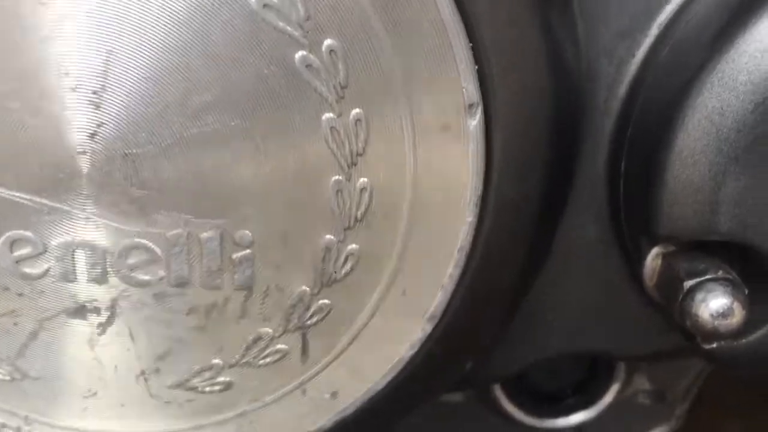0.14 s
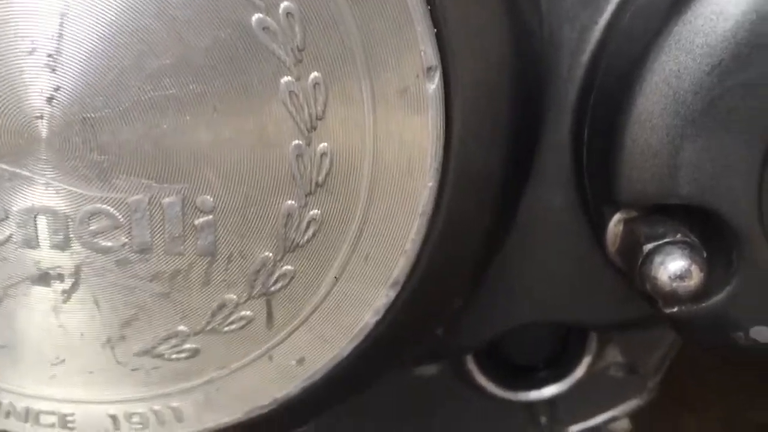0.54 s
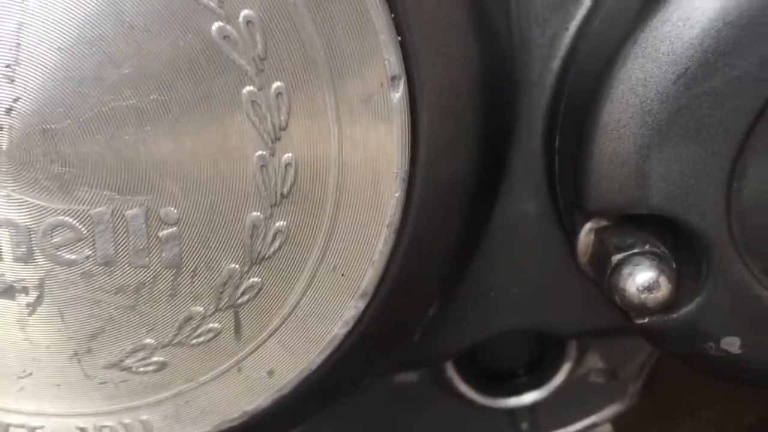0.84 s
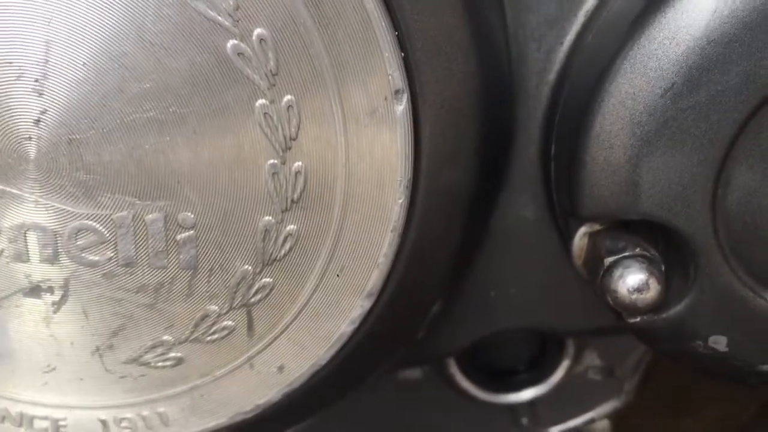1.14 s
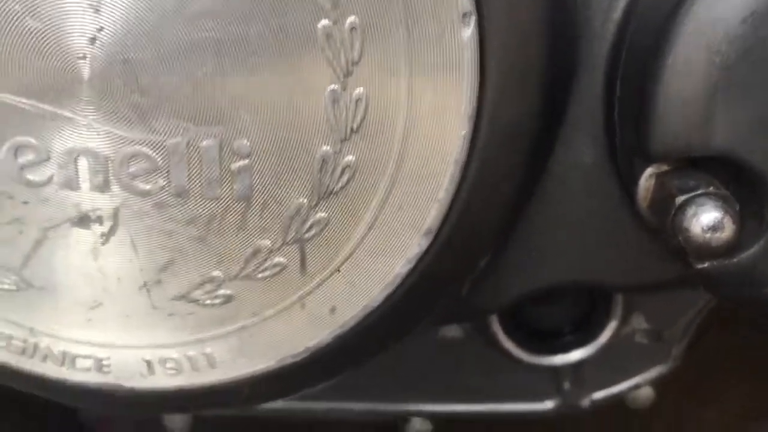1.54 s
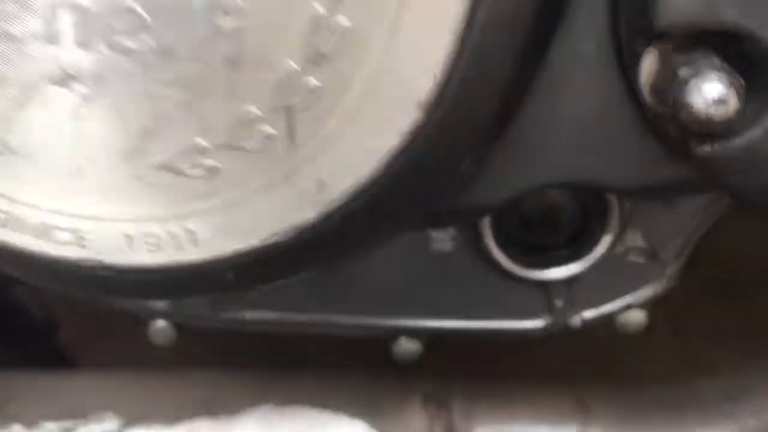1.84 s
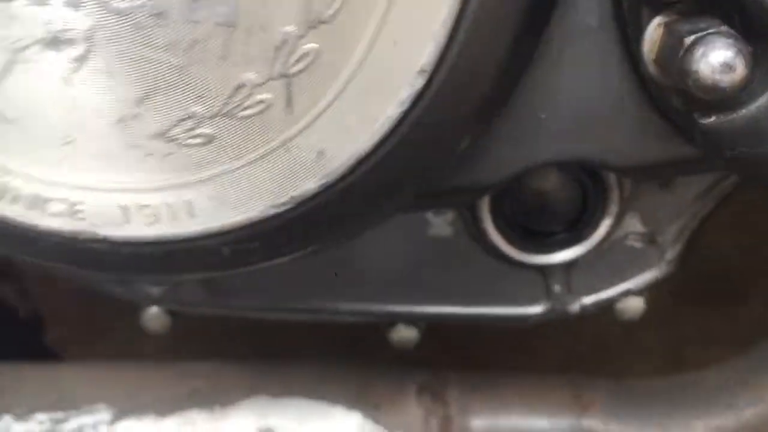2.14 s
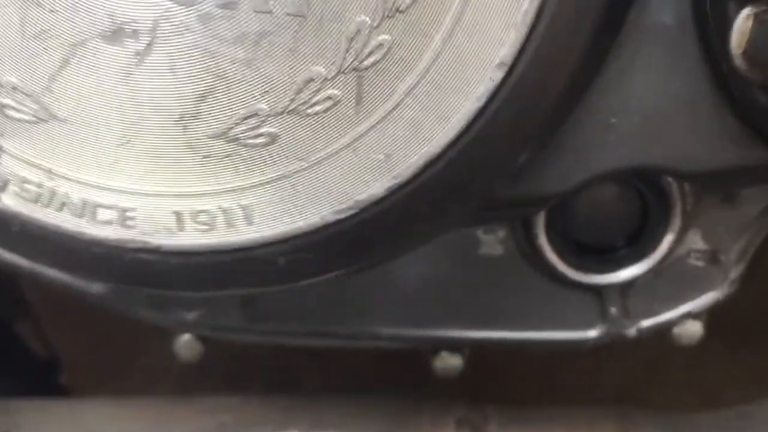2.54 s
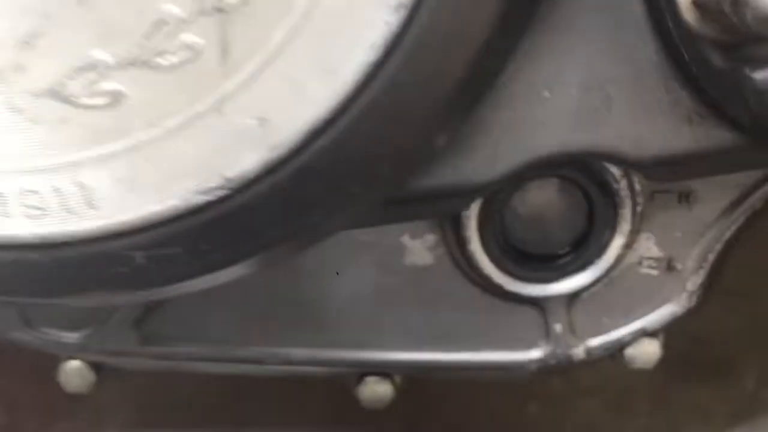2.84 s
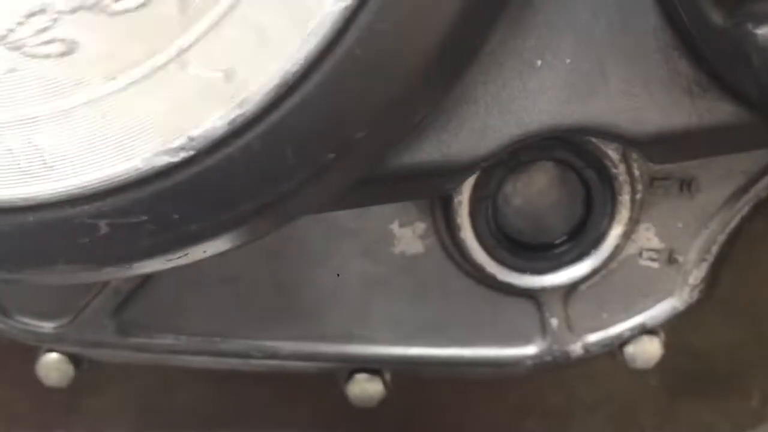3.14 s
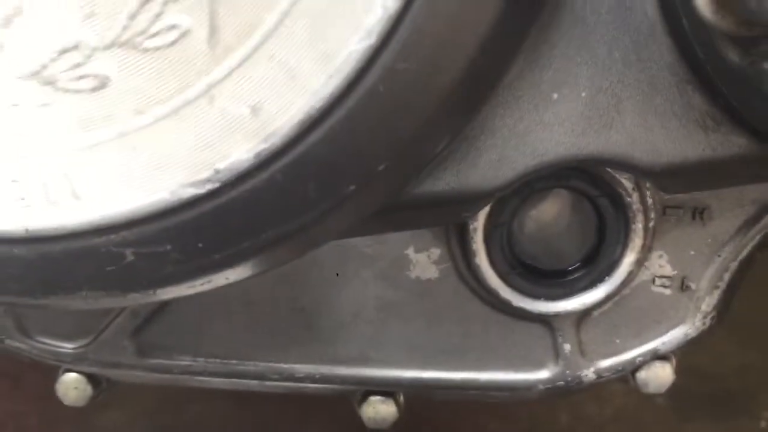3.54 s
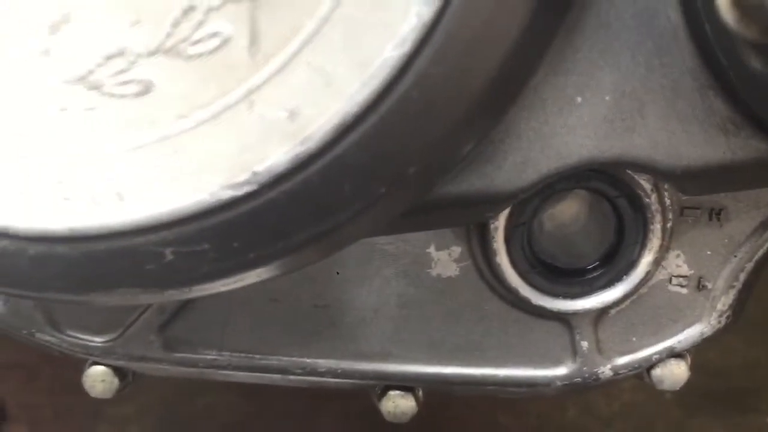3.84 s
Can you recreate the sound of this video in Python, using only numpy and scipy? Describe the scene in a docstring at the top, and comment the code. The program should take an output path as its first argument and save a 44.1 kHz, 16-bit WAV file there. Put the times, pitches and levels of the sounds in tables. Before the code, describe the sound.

A motorcycle engine starts beside the microphone, outdoors. Until about 0.85 s there is faint low rumble, a distant motor and light rustles, with a low hum swelling from 0.6 s. At 0.86 s the starter gear clacks in, grinds and whines, then coasts with short rasps, fading by about 2 s. After weak puffs, it catches near 1.3 s: boomy pulses, quickening slightly to about fifteen per second, with metallic rattle, continue to the end.

```python
"""A motorcycle starts cold, heard close to the crankcase. First come faint outdoor noise, low rumble, a distant
motor and a few rustles. A low hum swells, then the starter gear slams in as ringing metal and a noise crack.
It grinds and whines, made from random knocks and a wavering tone, coasts down as fading noise and rasps again.
After two weak puffs the engine catches: valve gear and chain rattle as shaped noise, and each firing rings
the exhaust and a long low boom as damped sines. The idle creeps up."""
import sys
import numpy as np
from scipy import signal
from scipy.fft import rfft, irfft, next_fast_len
from scipy.io import wavfile
from scipy.ndimage import uniform_filter1d, map_coordinates

SR = 44100
rng = np.random.default_rng(int(sys.argv[2]) if len(sys.argv) > 2 else 0)


def field_ratio(decibels):
    """Amplitude ratio for a level in dB (20 dB per decade); scalars and array-likes work."""
    return 10 ** (np.asarray(decibels, dtype=float) / 20)


def persist_wave(psi):
    """Save psi, clipped to +-1, as 16-bit WAV."""
    counts = np.round(np.clip(psi, -1, 1) * 32767).astype(np.int16)
    wavfile.write(sys.argv[1], SR, np.atleast_2d(counts).T)


N = 176400  # samples: 4 s


def unit(x):
    """Scaled to rms 1."""
    return x / np.sqrt(np.mean(x ** 2) + 1e-20)


def noise():
    """White noise of the scene's length."""
    return rng.standard_normal(N)


def curves(rows):
    """One value per sample for each column after the time."""
    s, *cols = np.transpose(rows)
    return [np.interp(np.arange(N) / SR, s, c) for c in cols]


def wobble(rate):
    """A smooth random curve through rate random points a second."""
    points = rng.standard_normal(int(N * rate / SR) + 4)
    return map_coordinates(points, [np.arange(N) * rate / SR])


def span(t0, t1):
    """1 between two times in seconds, with 3 ms edges."""
    t = np.arange(N) / SR
    return np.clip(np.minimum(t - t0, t1 - t) * 333, 0, 1)


def filtered(x, response):
    """x times a response of frequency."""
    m = next_fast_len(N + SR // 2)
    return irfft(rfft(x, m) * response(np.fft.rfftfreq(m, 1 / SR)), m)[:N]


def coloured(x, spectrum):
    """x shaped by a curve through (pitch_hz, level_db) points, rms 1."""
    f, v = np.transpose(spectrum)
    return unit(filtered(x, lambda hz: field_ratio(np.interp(np.log(hz + 1), np.log(f + 1), v))))


def resonant(x, peaks):
    """x through resonances (pitch_hz, width_hz, level_db), rms 1."""
    def response(f):
        total = 0
        for k, (centre, width, db) in enumerate(peaks):
            peak = 1j * f * width / (centre * centre - f * f + 1j * f * width)
            total = total + (-1) ** k * field_ratio(db) * peak  # neighbours have opposite sign
        return total
    return unit(filtered(x, response))


def patchy(x, depth_db):
    """x with small random patches of gain in time and frequency, rms 1."""
    z = signal.stft(x, nperseg=256)[2]
    field = uniform_filter1d(rng.standard_normal(z.shape), size=4, axis=0)
    field = uniform_filter1d(field, size=4, axis=1)
    return unit(signal.istft(z * field_ratio(depth_db * unit(field)), nperseg=256)[1][:N])


def knocks(per_s, spread_db, hiss):
    """Random metal contacts of uneven size over hiss."""
    size = field_ratio(spread_db * np.minimum(rng.exponential(size=N), 4)) * noise()
    return unit(size * (rng.random(N) < per_s / SR)) + hiss * noise()


def ring(t, hz, db, t60, attack_s=0.0016, swoop=0):
    """A damped sine from t = 0 that starts flat by the share swoop and glides up to pitch."""
    t = np.maximum(t, 0)
    glide_s = 0.014
    turns = hz * (t - swoop * glide_s * (1 - np.exp(-t / glide_s)))
    return field_ratio(db - 60 * t / t60) * np.sin(2 * np.pi * turns) * (1 - np.exp(-t / attack_s)) ** 2


# outdoor noise over time: time_s, level_db
YARD_LEVEL = [(0.05, -49.5), (0.466, -48), (0.58, -51), (0.702, -54), (0.85, -49)]
# tone of the outdoor noise: pitch_hz, level_db (relative)
YARD_COLOUR = [(150, -45), (250, -0.5), (418, -7.5), (570, 0.5), (900, -7), (2200, -9), (4500, -20),
               (15000, -39.5)]


def outdoors():
    """Faint outdoor noise: patchy shaped noise."""
    return field_ratio(curves(YARD_LEVEL)[0]) * patchy(coloured(noise(), YARD_COLOUR), depth_db=2.0)


# tone of the rumble: pitch_hz, level_db (relative)
RUMBLE_COLOUR = [(25, -24), (38, -41), (59, 15.5), (129, -4.5), (170, -8.5), (215, -8), (420, -68)]


def rumble():
    """Low shaped noise whose level drifts around -32.5 dB."""
    return field_ratio(-32.5 + 1.23 * wobble(6.34)) * coloured(noise(), RUMBLE_COLOUR)


# steady tones of a distant motor: pitch_hz, level_db (before slow wobble)
MOTOR_TONES = [(53.8, -38.5), (156.1, -56), (209.9, -63)]


def distant_motor():
    """A few sines of drifting level that fade out by 0.38 s."""
    t = np.arange(N) / SR
    fade = np.clip((0.38 - t) / 0.057, 0, 1)
    tones = sum(field_ratio(db + 1.6 * wobble(6.3)) * np.sin(2 * np.pi * hz * t) for hz, db in MOTOR_TONES)
    return np.sqrt(2) * tones * fade


# rustles near the microphone: start_s, length_s, level_db (before wobble and fade), centre_hz, width_hz
RUSTLE_EVENTS = [(.007, .06, -49, 6000, 6000), (.432, .28, -53, 4800, 1900), (.75, .3, -56, 1900, 400),
                 (.79, .3, -62, 7000, 2000)]
# a faint tone in a rustle: start_s, length_s, level_db (before wobble), pitch_hz
SQUEAK_EVENT = (.44, .12, -60, 3250)


def rustle():
    """Short bands of grainy noise that start quickly and fade, one with a faint squeak."""
    t, out = np.arange(N) / SR, 0
    for start, length, db, hz, width_hz in RUSTLE_EVENTS:
        grains = knocks(600, spread_db=3, hiss=1.5)
        grains = unit(filtered(grains, lambda f: np.exp(-((f - hz) / width_hz) ** 2)))
        fade = np.clip(1 - (t - start) / length, 0, 1) * span(start, start + length)
        out = out + field_ratio(db + 2.5 * wobble(30)) * fade * grains
    start, length, db, hz = SQUEAK_EVENT
    squeak = field_ratio(db + 3.3 * wobble(50)) * np.sin(2 * np.pi * hz * t)
    return out + span(start, start + length) * squeak


# the low hum: time_s, pitch_hz, level_db
HUM_PATH = [(0.45, 74.7, -51), (0.554, 72.6, -49), (0.633, 72.9, -21.5), (0.702, 70.8, -20),
            (0.775, 79.3, -37), (0.79, 78.3, -22.5), (0.824, 76.4, -29), (0.855, 74.8, -17),
            (0.908, 69, -20.5), (1.161, 69.2, -25.5), (1.176, 70.8, -41), (1.234, 72.1, -20.5),
            (1.3, 73.5, -23)]


def hum():
    """One low sine that swells before the start, its pitch and level wandering."""
    hz, db = curves(HUM_PATH)
    tone = np.sqrt(2) * np.sin(2 * np.pi * np.cumsum(hz) / SR)
    return field_ratio(db) * tone * span(HUM_PATH[0][0], HUM_PATH[-1][0])


# the gear slamming in: time_s, level_db (relative)
SLAM_HITS = [(0.8634, -3)]
# ringing of the slam: pitch_hz, level_db (relative), ring_s (time to fall 60 dB)
SLAM_RINGS = [(1750, -5, .03), (2900, -6, .02), (4680, -3, .012), (7230, -3, .012), (8000, 0, .012)]


def slam():
    """The starter gear hits home: damped metal rings and a short crack of noise."""
    t, rings, crack = np.arange(N) / SR, 0, 0
    crack_t60 = 0.02  # s
    for s, db in SLAM_HITS:
        for hz, level, t60 in SLAM_RINGS:
            rings = rings + ring(t - s, hz, db + level - 6, t60, attack_s=0.00031)
        crack = crack + field_ratio(db - 10 - 60 * np.maximum(t - s, 0) / crack_t60) * (t > s)
    return rings + crack * noise()


# starter under load: time_s, level_db (relative)
GRIND_LEVEL = [(.868, -26), (.88, -29), (.905, -20), (.95, -17), (.99, -17), (1.015, -20), (1.055, -15),
               (1.074, -18), (1.09, -30)]
# resonances of the gear housing: pitch_hz, width_hz, level_db (relative)
HOUSING = [(1910, 140, 3.5), (2193, 21, 1.5), (2530, 86, 0), (3064, 94, 2.5), (3410, 99, -1),
           (4356, 57, -4), (8570, 90, -12.5), (9750, 260, -16.5)]
# tone of the noise under the gear teeth: pitch_hz, level_db (relative)
GRIND_BED = [(300, -18.5), (771, -19.5), (1170, -7), (1270, -14), (1980, 0), (4690, -19.5), (10400, -24.5),
             (15700, -33)]
# the gear rasps again on the next compression: start_s, length_s, level_db (relative)
RASP_EVENTS = [(1.186, .011, -15), (1.2, .008, -15), (1.236, .011, -17), (1.247, .022, -11.5)]
# the rasps also ring the pinion: pitch_hz, width_hz, level_db (relative)
PINION_RING = [(7130, 110, -7)]


def grinding():
    """Gear teeth knock through the housing's resonances over a noise bed; later rasps also ring the pinion."""
    teeth = resonant(knocks(550, spread_db=1, hiss=1.2), HOUSING)
    bed = coloured(noise(), GRIND_BED)
    grind = patchy(teeth + .9 * bed, depth_db=1.6)
    load = field_ratio(curves(GRIND_LEVEL)[0] + 2.5) * span(GRIND_LEVEL[0][0], GRIND_LEVEL[-1][0])
    rasp = sum(field_ratio(db) * span(s - .002, s + length + 0.00097) for s, length, db in RASP_EVENTS)
    pinion = field_ratio(-16) * resonant(noise(), PINION_RING)
    return (load + rasp) * grind + rasp * pinion


# starter whine under load: time_s, pitch_hz (before wobble), level_db (before wobble)
WHINE_PATH = [(0.901, 4900, -48), (.98, 5150, -31), (1.04, 6000, -34), (1.071, 5150, -28),
              (1.085, 5100, -50)]


def whine():
    """An unsteady gear tone and its half order climb and sag with the motor's speed."""
    hz, db = curves(WHINE_PATH)
    turn = 2 * np.pi * np.cumsum(hz + 170 * wobble(300)) / SR
    tone = field_ratio(4 * wobble(80)) * np.sin(turn)
    half_order = field_ratio(9 + 3 * wobble(60)) * np.sin(turn / 2)
    return field_ratio(db) * (tone + half_order) * span(WHINE_PATH[0][0], WHINE_PATH[-1][0])


# starter coasting: time_s, level_db (before surge and flicker)
COAST_LEVEL = [(1.058, -25), (1.1, -20.5), (1.3, -18.5), (1.549, -25), (1.8, -30), (2.3, -65)]
# tone of the coasting noise: pitch_hz, level_db (relative)
COAST_COLOUR = [(260, -7), (450, -13.5), (1270, -17.5), (1770, 2), (2380, -9.5), (4120, -10.5), (4930, -20),
                (9190, -22), (15700, -30.5)]
# rings of the freewheeling gear: pitch_hz, width_hz, level_db (relative)
FREEWHEEL_RINGS = [(1740, 110, -3.5), (3330, 130, -1.5), (4100, 290, -1.5), (4430, 49, -3), (7060, 50, -28),
                   (9230, 260, -12), (10500, 280, -13.5)]


def freewheel():
    """The gear coasts: shaped noise and ringing knocks, surging unevenly as they fade."""
    rings = resonant(knocks(1500, spread_db=3.5, hiss=0.59), FREEWHEEL_RINGS)
    spin = patchy(coloured(noise(), COAST_COLOUR) + field_ratio(-4) * rings, depth_db=1.8)
    coast = field_ratio(curves(COAST_LEVEL)[0]) * span(COAST_LEVEL[0][0], COAST_LEVEL[-1][0])
    return coast * field_ratio(wobble(14.74)) * spin


def starter():
    """Grinding, rasps and freewheel share one quick flicker of level."""
    flicker = field_ratio(.7 * wobble(200) + 1.2 * wobble(45))
    return flicker * (grinding() + freewheel())


# weak puffs before it catches: time_s, level_db (relative)
PUFF_EVENTS = [(1.122, -16), (1.278, -18)]
# exhaust pipe rings: pitch_hz (before tuning), level_db (relative), ring_s (to fall 60 dB), delay_s
PIPE_RINGS = [(186.6, 4.5, 0.037, 0.0018), (214.2, -1.5, 0.052, 0.00277), (249.34, -8.5, 0.36, 0.00457),
              (268.4, -25.5, 0.75, 0.0015), (297.2, -30.5, 0.31, 0.0013), (326.8, -23.5, 0.38, 0.0033)]
# low thump rings: pitch_hz, level_db (relative), ring_s (to fall 60 dB), delay_s
THUMP_RINGS = [(109.8, -15.5, 0.26, 0.0028), (155.4, 0, 0.045, 0.0036)]


def puffs():
    """Weak puffs ring only the two lowest pipe modes and the thump, all at once."""
    out, t = np.zeros(N + 2 * SR), np.arange(SR) / SR
    for when, db in PUFF_EVENTS:
        rings = [ring(t, hz, db + level, t60) for hz, level, t60, _ in PIPE_RINGS[:2] + THUMP_RINGS]
        out[round(when * SR):][:SR] += sum(rings)
    return out[:N]


# crank position, also used for the firings: time_s, firings_so_far
CRANK_TURNS = [(1.2942, 0), (1.5654, 3), (1.65, 4), (1.7293, 5), (1.8824, 7), (2.0322, 9), (2.2578, 12),
               (2.4049, 14), (2.551, 16), (2.7634, 19), (2.9767, 22), (3.1154, 24), (3.3179, 27),
               (3.519, 30), (3.7183, 33), (3.9197, 36), (4.0534, 38)]
# rattle over time: time_s, level_db (relative)
RATTLE_LEVEL = [(1.27, -30.5), (1.45, -33), (1.75, -32), (2.85, -35.5), (3.98, -33.5)]
# tone of chain and gears in the cases: pitch_hz, level_db (relative)
CASE_COLOUR = [(220, 5), (480, -10.5), (1110, -3.5), (1260, -5.5), (1950, -3), (2240, -11), (3990, -17),
               (7320, -23.5), (10300, -31), (11100, -33), (15700, -36)]
# hiss swells after each firing: place (share of cycle), width (share of cycle), boost_db
FIRING_SWELL = [(.12, .15, 3)]
# valve events in each cycle: place (share of cycle), width (share of cycle), boost_db
VALVE_EVENTS = [(.3, .09, 6), (.76, .05, 8)]
# the ringing cover: pitch_hz, width_hz, level_db (relative)
COVER_RINGS = [(656, 87, -5), (1706, 187, -0.5), (2005, 137, 2), (3880, 114, -12.5), (11200, 130, -21)]
# a sharp tick at each firing: place (share of cycle), width (share of cycle), boost_db
TICK_TIMING = [(0.004, 0.04, 6)]
# tone of the tick: pitch_hz, level_db (relative)
TICK_COLOUR = [(350, -22), (800, 3), (2500, -25), (7000, -3), (15700, -12)]


def rattle():
    """Chain and gears hiss in the cases; the valves tap a ringing cover twice a cycle; each firing ticks."""
    cycle, = curves(CRANK_TURNS)

    def timed(rows):
        """Gain that rises around set places in every cycle."""
        boost = 0
        for at, width, db in rows:
            distance = (cycle - at + .5) % 1 - .5
            boost = boost + db * np.exp(-.5 * (distance / width) ** 2)
        return field_ratio(boost)

    chain = coloured(knocks(1500, spread_db=0.5, hiss=1.46), CASE_COLOUR)
    chain = timed(FIRING_SWELL) * patchy(chain, depth_db=1.5)
    taps = resonant(knocks(660, spread_db=2.5, hiss=.5), COVER_RINGS)
    taps = field_ratio(-4.5) * unit(timed(VALVE_EVENTS) * taps)
    tick = coloured(knocks(1500, spread_db=2, hiss=.5), TICK_COLOUR)
    tick = field_ratio(-18.5) * (timed(TICK_TIMING) - 1) * tick
    level = field_ratio(curves(RATTLE_LEVEL)[0] + 5)
    return level * span(RATTLE_LEVEL[0][0], 5) * (chain + taps + tick)


# how the engine fires: time_s, strength_db, pipe_tuning (ratio), thump_db, boom_db,
# bite_db (on the two lowest and two highest pipe rings); all dB relative
FIRING_EFFORT = [(1.29, -1.2, 0.89, 6.5, 6, 0), (1.6, 1.2, 0.98, 2, 0.5, -3.4),
                 (2.002, -2, 0.97, 2.5, 6, 1.9), (2.6, -1.5, 0.98, 1, -.6, -1),
                 (3.2, -2.9, 1.005, 2.5, 2, -1), (3.5, 0.5, 0.99, -7, -4, -6)]


def firings():
    """Each firing rings the pipe, whose tuning rises overall as the gas warms, and a long low boom."""
    s, count = np.transpose(CRANK_TURNS)
    times = np.interp(np.arange(count[-1]), count, s)
    chance = rng.standard_normal((len(times), 2 + len(PIPE_RINGS) + len(THUMP_RINGS)))
    times = times + 0.00015 * chance[:, 0]  # timing jitter, s
    at, *cols = np.transpose(FIRING_EFFORT)
    out, t = np.zeros(N + 2 * SR), np.arange(SR) / SR
    short = t[:SR // 4]
    for when, row in zip(times, chance):
        db, tune, thump_db, boom_db, bite_db = [np.interp(when, at, c) for c in cols]
        modes = []
        for k, (hz, level, t60, late) in enumerate(PIPE_RINGS):
            bite = bite_db * (k not in (2, 3))
            swoop = .018 * max(-bite_db, 0) * (k == 2)  # softer firings start the main pipe mode flat
            modes.append((hz * tune, level + bite, t60, late, swoop))
        modes += [(hz, level + thump_db, t60, late, 0) for hz, level, t60, late in THUMP_RINGS]
        boom_t60 = 0.62 * field_ratio(0.56 * min(boom_db, 0))  # s; a weaker boom also dies sooner
        blow = ring(t - 0.0087, 70.06, -12.5 + boom_db, boom_t60)
        for (hz, level, t60, late, swoop), c in zip(modes, row[2:]):
            blow[:len(short)] += ring(short - late, hz, level + .8 * c, t60, swoop=swoop)
        out[round(when * SR):][:SR] += field_ratio(db + .5 * row[1]) * blow
    return out[:N]


# tone of uneven gas flow in the pipe: pitch_hz, level_db (relative)
FLOW_COLOUR = [(40, -60), (64, -32), (145, 16), (241, 17), (289, -29), (500, -34), (700, -100)]


def gas_flow():
    """Uneven gas flow in the pipe: low shaped noise from the first firing on."""
    return field_ratio(-28) * span(CRANK_TURNS[0][0], 5) * coloured(noise(), FLOW_COLOUR)


def scene():
    """Everything reaches one microphone."""
    surroundings = outdoors() + rumble() + distant_motor() + rustle()
    starting = hum() + slam() + starter() + whine()
    engine = puffs() + rattle() + firings() + gas_flow()
    return (surroundings + starting + engine)[None]


def roll_off(x):
    """The treble ends steeply here."""
    return signal.sosfilt(signal.butter(12, 16510, fs=SR, output="sos"), x)


def record(dry):
    """The microphone drops the deepest bass and all above 15.75 kHz; peaks are rounded off."""
    low_hz, ceiling = 52, .98  # ceiling: share of full scale
    x = filtered(dry[0], lambda hz: 1 / np.sqrt(1 + (low_hz / (hz + 1)) ** 20) * (hz < 15750))
    x = x / (1 + np.abs(x / ceiling) ** 12) ** (1 / 12)
    return roll_off(x[None])


dry = scene()
out = record(dry)
persist_wave(out)
```